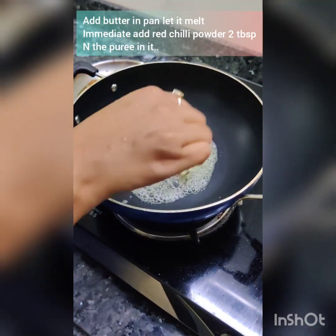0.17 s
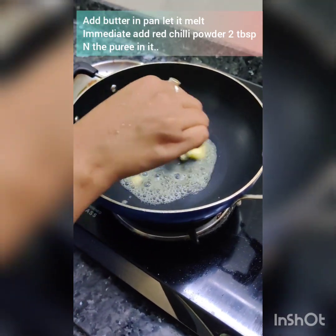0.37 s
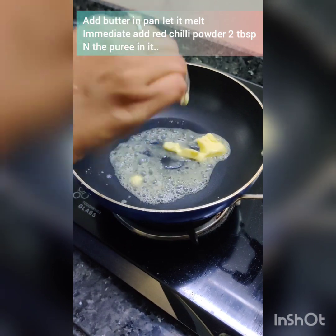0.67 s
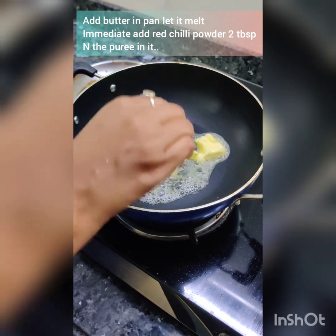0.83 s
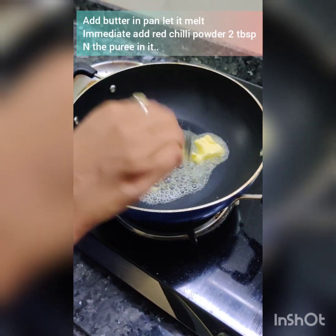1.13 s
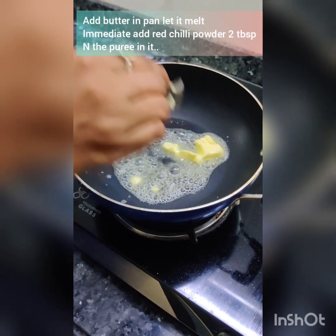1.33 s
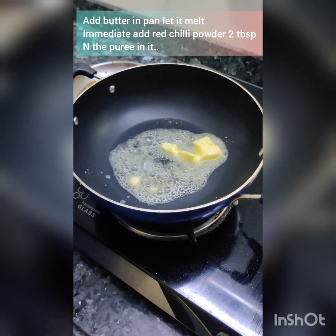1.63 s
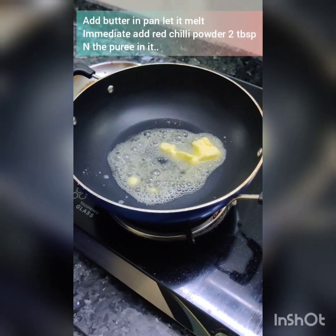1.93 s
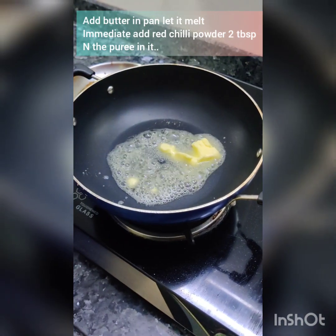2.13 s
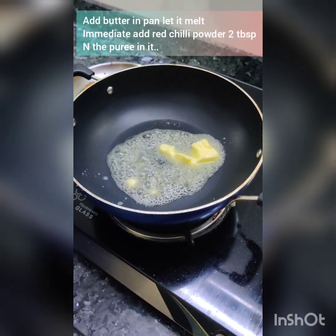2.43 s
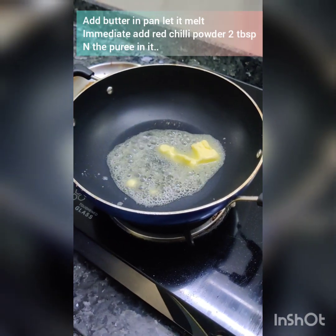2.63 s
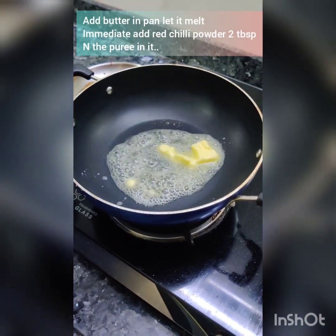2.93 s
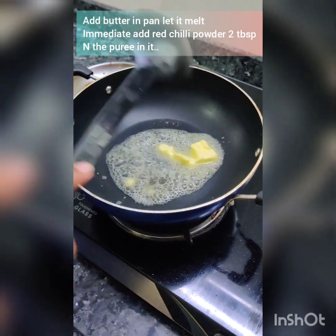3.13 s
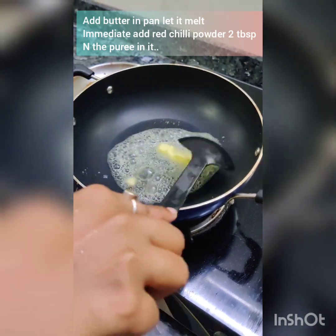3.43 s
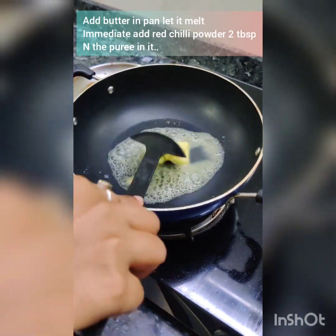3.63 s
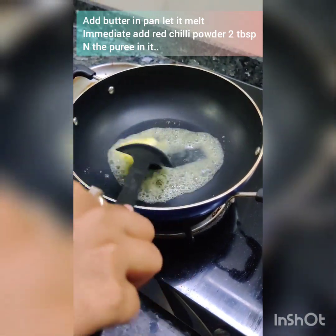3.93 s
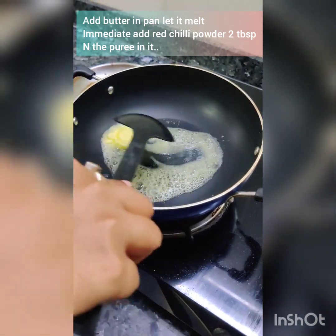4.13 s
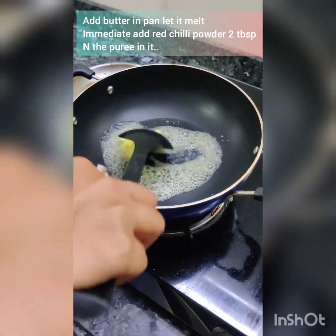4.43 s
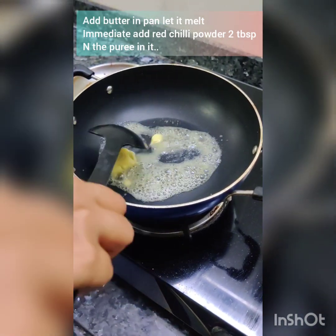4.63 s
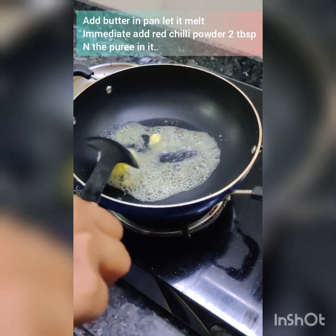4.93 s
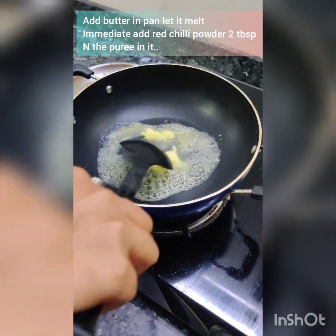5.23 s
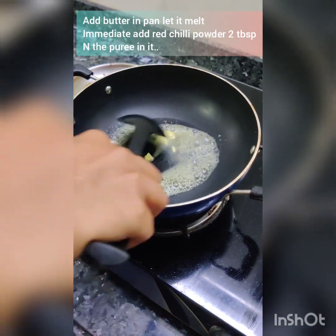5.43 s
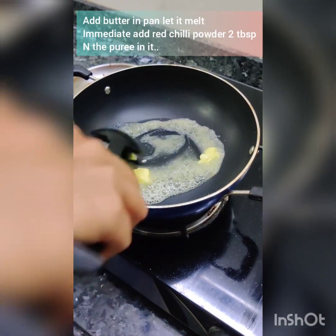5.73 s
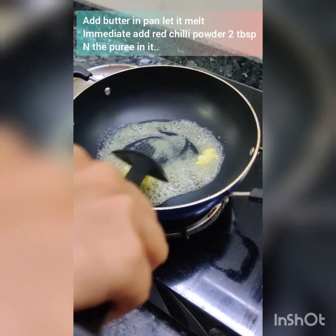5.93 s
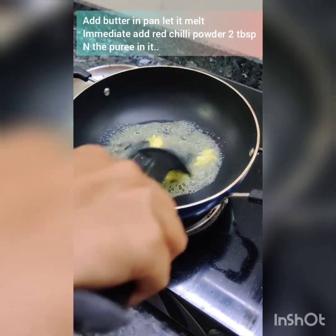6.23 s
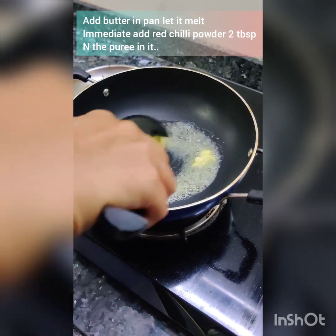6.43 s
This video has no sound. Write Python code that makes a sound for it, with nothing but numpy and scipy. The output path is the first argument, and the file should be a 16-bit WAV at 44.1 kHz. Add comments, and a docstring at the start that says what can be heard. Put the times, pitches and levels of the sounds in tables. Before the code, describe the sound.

Butter sizzles in a pan over a humming fan as a knife taps, clinks onto a steel plate, and a plastic spatula stirs.

```python
"""Butter sizzling in a pan

A small kitchen, heard from near the stove on a phone whose two microphone ports each colour the treble.
An exhaust fan hums while bubbles burst in the butter in a nonstick pan. A knife taps butter off against
the pan and is laid on a steel plate, which rings; then a plastic spatula stirs and knocks."""
import sys
import numpy as np
from scipy import signal
from scipy.fft import rfft, irfft, next_fast_len
from scipy.io import wavfile
from scipy.ndimage import uniform_filter1d

SR = 44100
rng = np.random.default_rng(int(sys.argv[2]) if len(sys.argv) > 2 else 0)


def int16_out(signal):
    """Quantize to a 16-bit WAV file."""
    q = np.round(np.clip(np.atleast_2d(signal).T, -1, 1) * 32767)
    wavfile.write(sys.argv[1], SR, q.astype(np.int16))


N = 290927


def amp(db):
    return 10 ** (np.asarray(db) / 20)


def unit(x):
    return x / np.sqrt(np.mean(x ** 2) + 1e-20)


def read(points, hz):
    """A curve through the points, straight on a log frequency axis."""
    f, value = np.transpose(points)
    return np.interp(np.log(hz + 1), np.log(f), value)


def add(mix, start_s, sound):
    part = mix[:, max(round(start_s * SR), 0):][:, :sound.shape[1]]
    part += sound[:, :part.shape[1]]


def convolve(x, response):
    return signal.oaconvolve(np.atleast_2d(x), np.atleast_2d(response), axes=1)[:, :x.shape[-1]]


def colour(x, points, size=4096):
    """Causal filter with the given spectrum."""
    log_gain = np.log(amp(read(points, abs(np.fft.fftfreq(size, 1 / SR)))))
    minimum_phase = np.exp(np.conj(signal.hilbert(log_gain)))
    return convolve(x, np.fft.ifft(minimum_phase).real[:size // 2])


def band(x, hz, q):
    """One broad resonance of gain 1."""
    return signal.lfilter(*signal.iirpeak(min(hz, .45 * SR), max(q, hz / SR * 2.5), SR), x)


def drift(hz):
    """A slow random wander of rms 1, rolling off above hz."""
    size = next_fast_len(N)
    f = np.fft.rfftfreq(size, 1 / SR)
    return unit(irfft(rfft(rng.standard_normal(size)) / (1 + (f / hz) ** 4), size)[:N])


def burst(t60, size=8192):
    """Dying noise of energy 1 at each port."""
    noise = rng.standard_normal((2, size)) * amp(-60 * np.arange(size) / SR / t60)
    return noise / np.linalg.norm(noise, axis=1, keepdims=True)


def ringing(modes, size, damping_db=0):
    """Struck metal: dying modes that reach each port in a different phase."""
    t = np.arange(size) / SR
    return sum(amp(db - 60 * t / t60 * amp(damping_db))
               * np.sin(2 * np.pi * (hz * t + rng.random((2, 1)))) for hz, db, t60 in modes)


def kitchen(x, wet_db, size=20000):
    """Adds the dense echoes of counter and walls, each band dying at its own speed."""
    # The room's decay. Each row: frequency in Hz, t60 in seconds.
    decay = [(200, 0.067), (1000, 0.4), (4000, 0.42), (9000, 0.53), (16000, 0.47)]
    echoes = rng.standard_normal((2, size)) * (rng.random((2, size)) < .1)
    hz, t, bands = signal.stft(echoes, SR, nperseg=256)
    tail = signal.istft(bands * amp(-60 * t / read(decay, hz)[:, None]), SR, nperseg=256)[1]
    tail[:, :SR // 300] = 0  # the gap before the first echo
    return x + amp(wet_db) * convolve(x, tail / np.linalg.norm(tail, axis=1, keepdims=True))


def fan():
    """The exhaust fan: wavering blade tones beat against the motor's hum over the rush of air."""
    # Shaft, blade and mains tones. Each row: frequency in Hz, rms level in dB, waver from 0 to 1.
    tones = [(22.15, -55, 0), (45.5, -53, 0.55), (67.2, -58, 1), (98.9, -47, 0.21), (110.2, -42, 0.1),
             (230.3, -58, 0.77), (330.6, -51.5, 0.8)]
    # The rush of air. Each row: frequency in Hz, relative level in dB.
    air_spectrum = [(15, -5), (45, 2.5), (80, -3.5), (120, -0.5), (170, -6), (250, -9.5), (400, -10.5),
                    (700, -11), (1100, -18), (3000, -13.5), (12000, -66)]
    # How alike the air is at the two ports. Each row: frequency in Hz, correlation.
    air_likeness = [(150, 1), (300, 0.98), (500, 0.23), (900, -0.12), (2000, -0.16)]
    t = np.arange(N) / SR
    hum = np.zeros(N)
    for hz, db, waver in tones:
        sway = (1 - waver) + waver * (drift(3.2) + 1j * drift(9.1)) / np.sqrt(2)
        hum += amp(db) * unit((sway * np.exp(2j * np.pi * (hz * t + rng.random()))).real)
    size = next_fast_len(N)
    f = np.fft.rfftfreq(size, 1 / SR)
    left, unrelated = rfft(rng.standard_normal((2, size)))
    likeness = np.clip(read(air_likeness, f), -1, 1)
    right = likeness * left + np.sqrt(1 - likeness ** 2) * unrelated
    air = irfft(np.array([left, right]) * amp(read(air_spectrum, f)), size)[:, :N]
    return hum + amp(-40.5) * unit(air)


def chatter(count=5, slowing=1.2, fade_db_per_s=220):
    """The knife rocks as it lands: each gap is longer than the last, each touch weaker."""
    # The knife set down, tip first. Each row: start and first gap in seconds, knife and plate gain in dB.
    landings = [(2.1035, 0.0078, -20.5, -60), (2.189, .0145, -25.5, -13.5)]
    touches = []
    for s, gap_s, knife_db, ring_db in landings:
        for k in range(count):
            delay = gap_s * sum(slowing ** j for j in range(k))
            fade_db = fade_db_per_s * delay
            touches.append((s + delay, knife_db - fade_db, ring_db - fade_db))
    return touches


def knife(touches):
    """The blade rings, clatters and ticks at every touch of steel on steel."""
    # The blade's modes. Each row: frequency in Hz, relative level in dB, t60 in seconds.
    blade_modes = [(2190, -8.5, 0.024), (6160, 6.5, 0.03), (6070, -5, .13), (6750, -7, .08),
                   (9380, -4, .08), (9650, -8, .05), (12200, -18, 0.054)]
    out = np.zeros((2, N))
    for s, db, _ in touches:
        add(out, s, amp(db - 1.5) * ringing(blade_modes, size=SR))
        add(out, s, amp(db + 26.5) * band(burst(t60=.019), hz=8100, q=2))
        add(out, s, amp(db + 13) * burst(t60=.003))
    return kitchen(out, wet_db=-9)


def plate(touches):
    """The knife's touches add energy to the steel plate's modes, each a close pair that beats."""
    # Each row: frequency in Hz, relative level in dB, t60 in seconds, left minus right in dB, beat in Hz.
    modes = [(1502, -15, .65, -5, 19), (2643, -23, .3, -8, 9), (3284, -9, .56, -1, 7),
             (5545, -7.5, .29, 1, 30), (6390, -21, .42, -1, 12), (6900, -18, .42, -6, 6),
             (8000, -23, .25, -6, 31), (8338, -9.5, .35, -6, 21), (8900, -24, .3, -4, 70),
             (11615, -13, .32, -2, 16), (12088, -18.5, .27, -10, 8), (12700, -23, .2, -4, 110),
             (15100, -18, .25, -2, 40), (15380, -18, .25, -2, 55)]
    t = np.arange(SR) / SR
    start = touches[0][0]

    def swing(t60):
        """Size of a mode's swing; each touch takes a few ms to spread through the plate."""
        energy = sum((t >= s - start) * amp(db - 60 * abs(t + start - s) / t60) ** 2
                     for s, _, db in touches)
        return uniform_filter1d(np.sqrt(energy), size=260)

    ring = np.zeros((2, N))
    jitter = rng.standard_normal((len(modes), 2, SR))
    rocking = unit(uniform_filter1d(uniform_filter1d(jitter, size=900), size=900))
    for (hz, db, t60, side_db, beat_hz), rock in zip(modes, rocking):
        phase = 2 * np.pi * hz * t + 1.24 * rock  # the rocking knife loads each mode unevenly
        tone = np.sin(phase + np.array([[0], [np.pi / 2]]))
        twin = .45 * np.sin(phase + 2 * np.pi * (beat_hz * t + rng.random((2, 1))))
        gain = amp(db + side_db * np.array([[.5], [-.5]]) + .5 * rock[::-1])
        add(ring, start, gain * swing(t60) * (tone + twin))
    # the crowd of weak high modes
    shimmer = unit(band(band(rng.standard_normal((2, SR)), hz=9900, q=.45), hz=9900, q=.45))
    add(ring, start, amp(-12.5) * swing(t60=.32) * shimmer)
    return kitchen(ring, wet_db=-10)


def pan_response(damping_db, crack_db, crack_t60, size=16384):
    """The pan rings; a pressed blade shortens its modes and leaves more of the contact's crack."""
    # The pan's modes. Each row: frequency in Hz, relative level in dB, t60 in seconds before damping.
    modes = [(330, -10, .15), (385, -11, .12), (860, -5, .1), (925, 1.5, .15), (995, .5, .14),
             (1190, -9, .07), (1350, -4.5, .05), (1450, -8, .05), (1690, -5, .08), (1760, -3, .1),
             (1917, -6, .12), (2650, -9, .06), (3130, -8, .06), (3290, -7, .07), (4150, -9, .06),
             (4480, -6, .07), (5600, -7, .05), (5850, -6, .05)]
    # The dense crack. Each row: frequency in Hz, relative level in dB.
    crack_spectrum = [(120, -6), (300, 14), (600, -3.5), (900, 2.5), (1500, -3.5), (2300, 2), (4400, -5.5),
                      (6000, -10), (7500, -9), (15000, -47)]
    ring = ringing(modes, size, damping_db)
    crack = colour(burst(crack_t60, size), crack_spectrum)
    return ring + amp(crack_db + damping_db) * crack


def contact(x, hz, dull_hz=920, dull_q=2.1, hard_q=.73):
    """A soft contact has a narrow spectrum; a harder one is brighter and wider."""
    return band(x, hz, max(dull_q * (dull_hz / hz) ** 2.6, hard_q))


def blow(db, hz, damping_db):
    """One knock rings the pan."""
    return amp(db - 2.5) * contact(pan_response(damping_db, crack_db=31.5, crack_t60=.012), hz)


def pressure(start, length, db, grip_s=.037, release_db_per_s=139):
    """A stroke takes hold, keeps its pressure, then eases off."""
    t = np.arange(N) / SR - start
    return np.clip(t / grip_s, 0, 1) * amp(db - release_db_per_s * np.maximum(t - length, 0))


def utensils():
    """Knife and spatula drive the pan with knocks and with the stick-slip grains of dragging."""
    # Each row: start in seconds, relative level in dB, spectral centre in Hz, damping in dB.
    blows = [(.003, -29, 1080, 1), (.456, -26.5, 970, 4), (.605, -31.5, 1600, -2), (.6125, -17, 3800, 2.5),
             (.6207, -21, 3200, 3.5), (4.03, -35, 854, 6), (4.594, -32.5, 1250, 5),
             (4.9279, -19.5, 1290, 7), (5.294, -29.5, 1040, 8.5), (5.478, -30.5, 890, 2.5),
             (5.799, -28.5, 1000, -1), (6.2727, -18.5, 850, 4), (6.298, -28, 930, 6),
             (6.47, -27, 950, -4.5)]
    # Drags over the pan. Each row: start and length in seconds, level in dB, spectral centre in Hz.
    strokes = [(0, .1, -47.5, 1050), (0.606, 0.088, -33.5, 1050), (4.023, .06, -45.5, 1200),
               (4.606, .07, -45.5, 1300), (4.95, .06, -39.5, 1400), (5.28, 0.049, -37, 1070),
               (5.396, 0.076, -43, 1050), (5.58, 0.23, -46.5, 1500), (5.757, 0.056, -37, 3000),
               (5.947, 0.034, -36, 1170), (6.266, .12, -37, 1020), (6.418, 0.054, -35, 1070)]
    knocks = np.zeros((2, N))
    for s, db, hz, damping_db in blows:
        add(knocks, s, blow(db, hz, damping_db))
        add(knocks, s + .064, blow(db - 17.5, hz=960, damping_db=6))  # the pan rocks back on its support
    slips = (rng.random(N) < 500 / SR) * rng.standard_normal(N)
    scrape = convolve(slips, pan_response(damping_db=5.5, crack_db=25.5, crack_t60=.023))
    drag = sum(unit(contact(scrape, hz)) * pressure(s, length, db) for s, length, db, hz in strokes)
    return kitchen(knocks + drag, wet_db=1)


def pops(per_s, spread_db, clump_db, low_hz, high_hz, q, pitches, left_lag=18):
    """Bubbles burst in clumps; each size has its own pitch and its own short paths to the two ports."""
    direct = np.array([signal.unit_impulse(256, left_lag), signal.unit_impulse(256)])
    out = np.zeros((2, N))
    count = int(per_s / pitches * N / SR)
    for hz in np.linspace(low_hz, high_hz, pitches):
        spread = spread_db * (1 - .5 * hz / high_hz)  # the smallest bubbles are the most alike
        signs = rng.choice([-1, 1], count)
        strengths = amp(spread * np.minimum(rng.exponential(1, count), 4.2))
        train = np.bincount(rng.integers(0, N, count), signs * strengths, N)
        paths = amp(-10.5) * direct + burst(t60=.0017, size=256)  # with reflections off the pan
        pop = unit(band(band(paths, hz, q), hz, q))
        out += convolve(unit(train), pop)
    return out * amp(clump_db * drift(hz=28))


def boil(settled_db, fresh_db, stirred_db, surge_db, settle_s=2.95, stir_from_s=5.03, stir_rise_s=.7):
    """Fresh butter boils hardest and settles as its water goes; stirring onto hot metal revives it."""
    t = np.arange(N) / SR
    freshness = np.exp(-t / settle_s)
    stirring = np.clip((t - stir_from_s) / stir_rise_s, 0, 1)
    return amp(settled_db + fresh_db * freshness + stirred_db * stirring + surge_db * drift(hz=3.3))


def sizzle():
    """The butter foams: fine fizz over the hiss of countless tiny bursts, larger bubbles, a few spits."""
    # Spectra of the fine and the larger bubbles. Each row: frequency in Hz, relative level in dB.
    fizz_spectrum = [(1000, -28.5), (2500, -12), (4000, -3.5), (5800, 1.1), (7600, -2), (10000, -3),
                     (11300, -6), (13000, -9), (15500, -8.5)]
    bubble_spectrum = [(300, -20), (700, -5), (1300, -6.5), (2200, -7), (3200, 3.5), (4500, 3), (7000, 1),
                       (14000, 16)]
    # Single drops of water that spit. Each row: start in seconds, relative level in dB.
    drops = [(1.8667, -18), (2.033, -25), (2.832, -15.5), (3.293, -22), (4.957, -15), (5.445, -19),
             (5.532, -21)]
    grains = pops(per_s=5000, spread_db=4.5, clump_db=1.7, low_hz=2620, high_hz=15900, q=1.7, pitches=28)
    hiss = amp(-3) * rng.standard_normal((2, N))
    fizz = unit(colour(unit(grains) + hiss, fizz_spectrum))
    large = pops(per_s=2500, spread_db=3, clump_db=1, low_hz=474, high_hz=5360, q=2.85, pitches=14)
    bubbles = unit(colour(large, bubble_spectrum))
    fizz *= boil(settled_db=-38.5, fresh_db=4, stirred_db=.1, surge_db=.7)
    bubbles *= boil(settled_db=-50, fresh_db=12.5, stirred_db=8, surge_db=.96)
    spits = np.zeros((2, N))
    for s, db in drops:
        add(spits, s, amp(db + 19.5) * band(burst(t60=.004), hz=6000, q=3))
    return kitchen(fizz + bubbles + spits, wet_db=-4)


def scene():
    """The kitchen as it reaches the phone."""
    touches = chatter()
    return fan() + knife(touches) + plate(touches) + utensils() + sizzle()


def record(dry):
    """The phone: each microphone port adds its own treble resonance, then a low-pass cuts the top."""
    # The ports' responses. Each row: frequency in Hz, gain in dB.
    left_port = [(400, 0), (2000, -1.5), (3000, -1.3), (4400, 1.7), (5100, 5), (5700, 12), (6100, 11.7),
                 (6500, 8.5), (7200, 2), (8200, -1.5), (9600, -5), (12000, -4), (15000, -.5)]
    right_port = [(400, 0), (2000, 1.5), (3000, 2.2), (6000, 1), (7600, 2), (9100, 9), (10000, 10),
                  (11300, 5.5), (15000, .3)]
    heard = np.vstack([colour(dry[0], left_port), colour(dry[1], right_port)])
    low_pass = signal.firwin(511, cutoff=15800, window=("kaiser", 9), fs=SR)
    return signal.oaconvolve(heard, low_pass[None], "same", axes=1)


dry = scene()
out = record(dry)
int16_out(out)
```